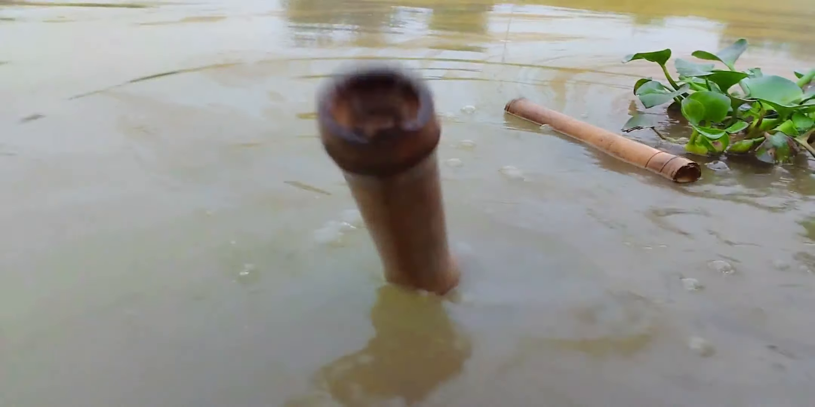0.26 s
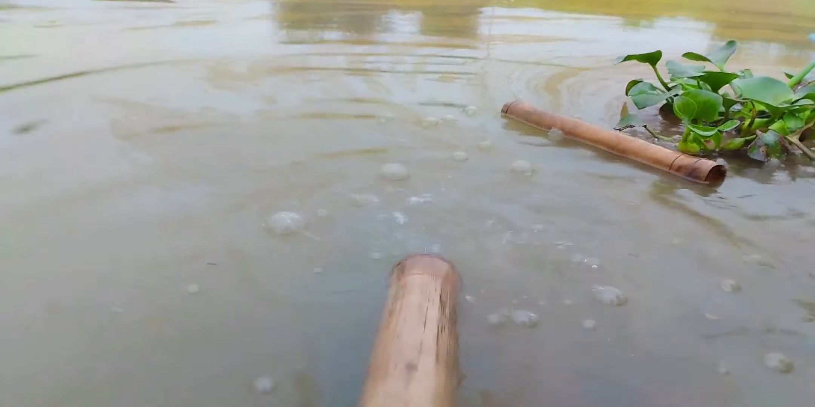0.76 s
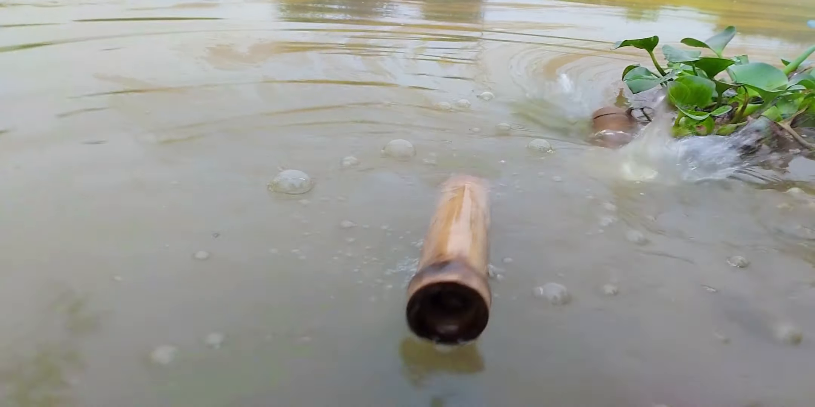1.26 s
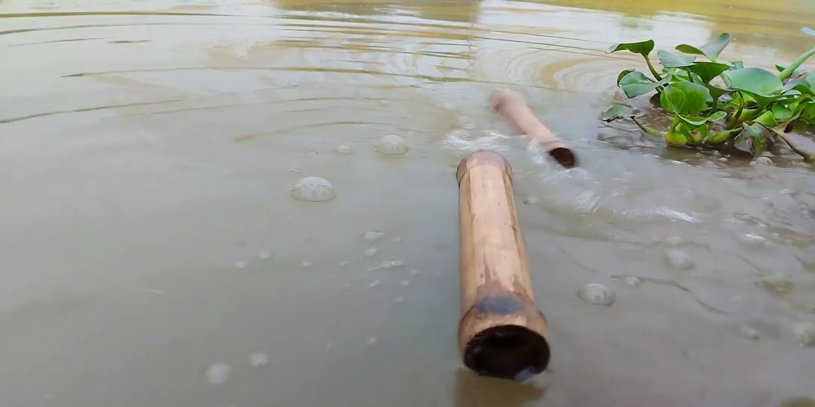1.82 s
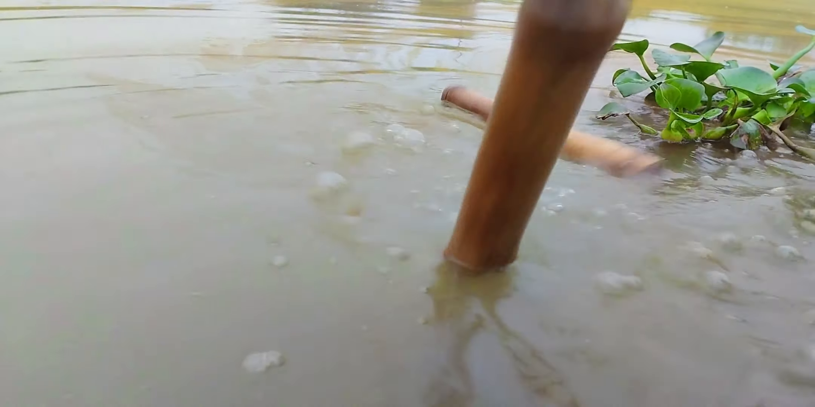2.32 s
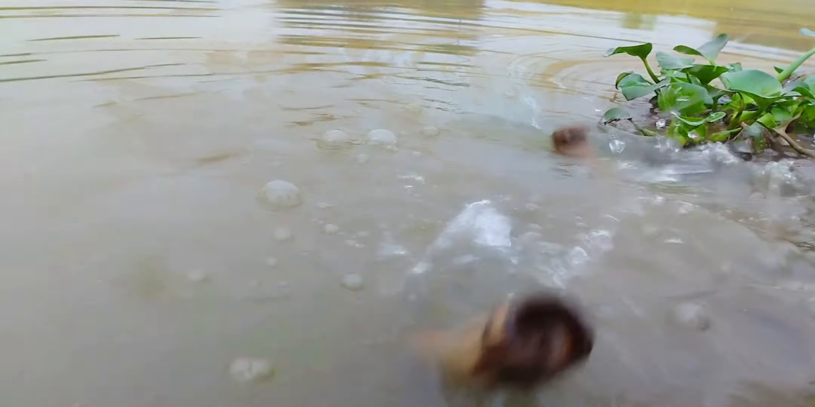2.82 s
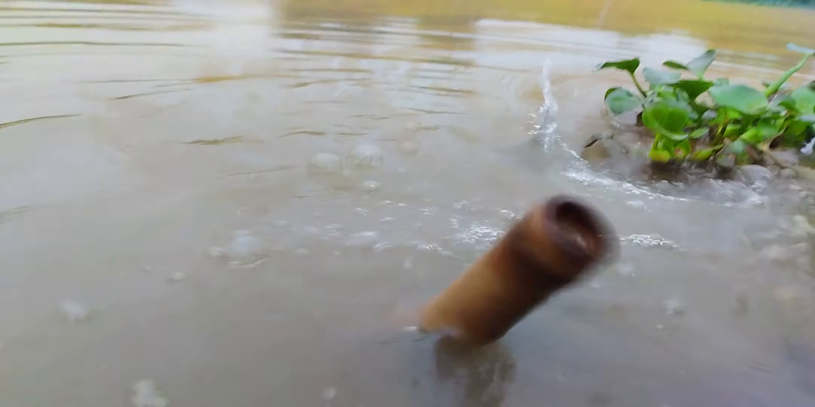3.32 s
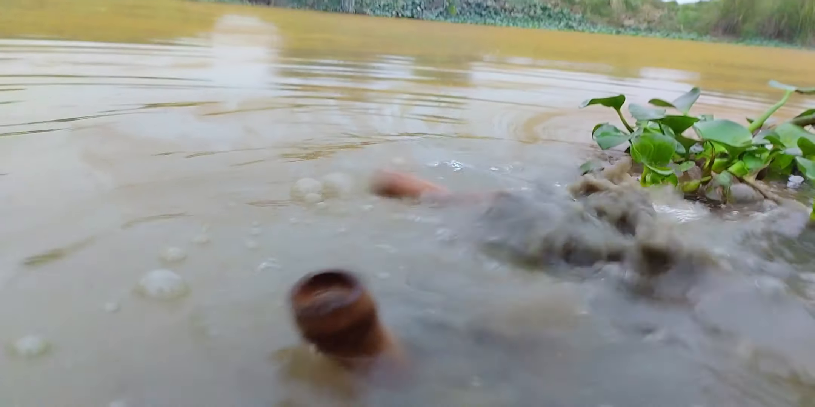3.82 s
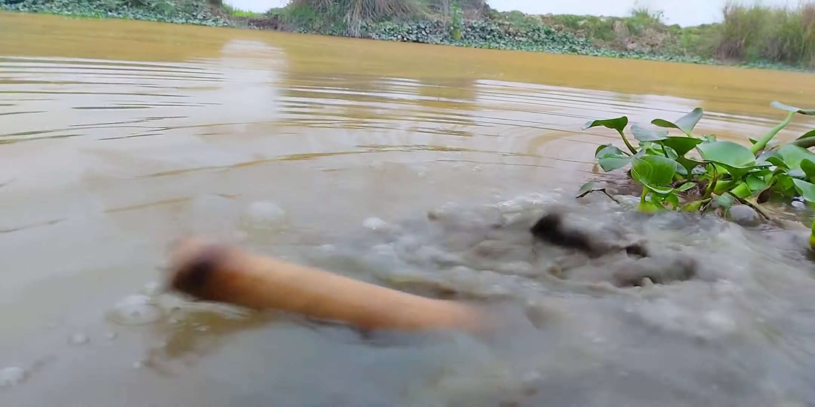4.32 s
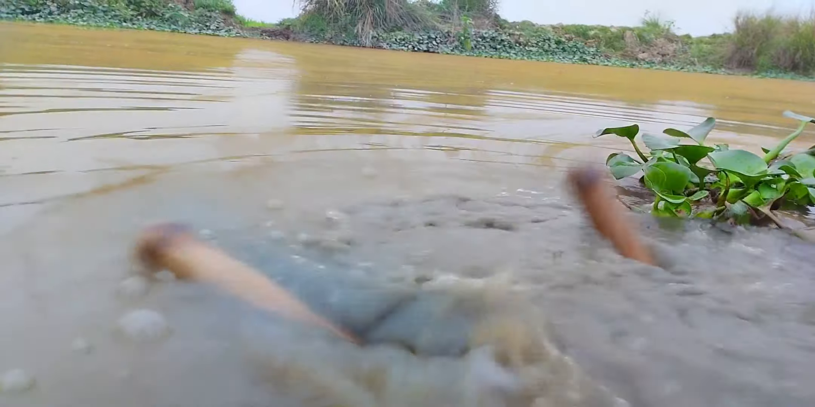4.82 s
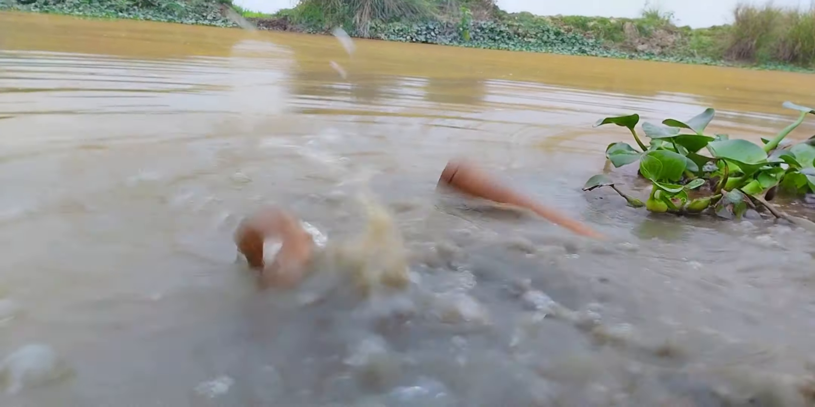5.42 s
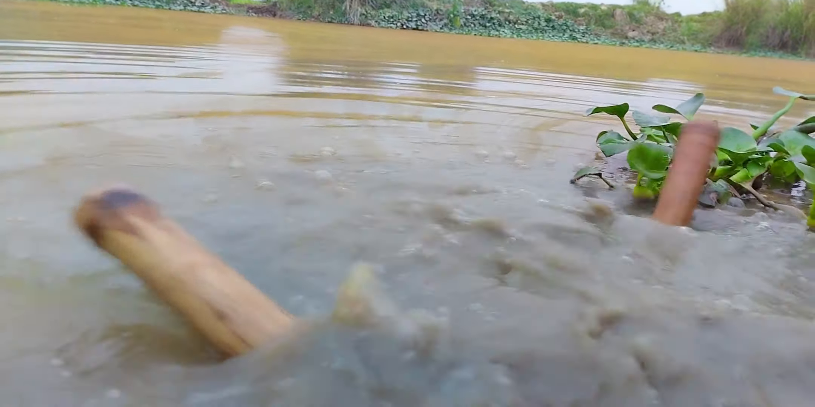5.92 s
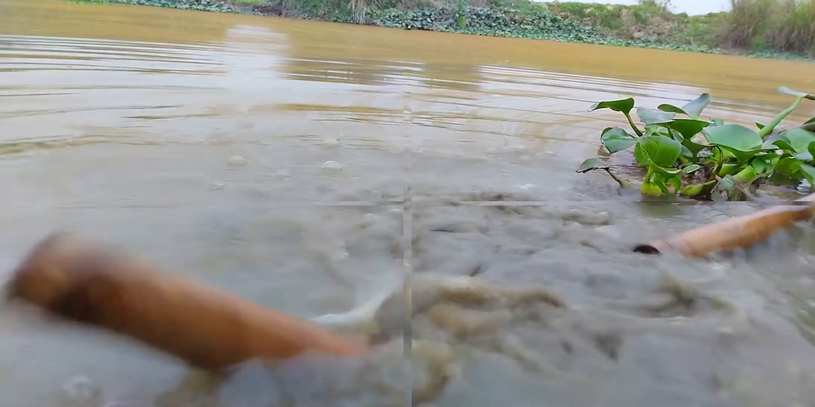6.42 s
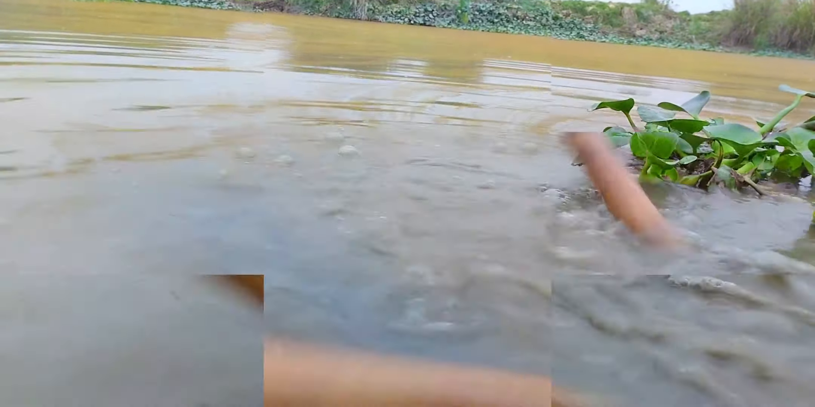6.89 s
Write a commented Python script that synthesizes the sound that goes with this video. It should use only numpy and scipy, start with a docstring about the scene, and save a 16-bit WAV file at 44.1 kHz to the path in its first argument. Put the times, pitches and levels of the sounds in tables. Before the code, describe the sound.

A hard splash and plop open the scene, then small clicks, slurps and drips, followed by scattered plunges of bamboo into shallow water. Around four seconds the stirred water bubbles thickly, and later splashes crowd together in clusters before thinning near the end. Close, dry outdoor perspective at a quiet riverbank, with low gusty wind buffeting the microphone and only the faintest echo.

```python
"""Bamboo tubes splashing in river shallows

Two bamboo tubes are jerked up and down in muddy shallows, close to the microphone. Their slaps are short
bursts of coloured noise; gushes of water are crowds of tiny ringing bubbles; dragged-under air rings as
plops, and closing hollows as rising notes. The stirred water gurgles and fizzes after each gush, the
tubes hum along, the bank scatters a faint echo, and a light, gusty wind rumbles on the microphone."""
import sys
import numpy as np
from scipy import signal
from scipy.fft import rfft, irfft
from scipy.io import wavfile

SR = 44100
rng = np.random.default_rng(int(sys.argv[2]) if len(sys.argv) > 2 else 0)


def transcribe(signal):
    """Save signal, clipped to [-1, 1], as a 16-bit WAV file at the path in sys.argv[1]."""
    frames = np.atleast_2d(signal).T
    limited = np.clip(frames, -1, 1)
    pcm = np.round(limited * 32767).astype(np.int16)
    wavfile.write(sys.argv[1], SR, pcm)


N = 315297
TIME = np.arange(N) / SR

# thrown water, before the trims in gushes(): start t/s, end t/s, body level/dB, spray level/dB
GUSHES = [(0.022, 0.053, -31, -27), (1.24, 1.3, -34, -41.5), (1.317, 1.427, -37.5, -41),
          (1.467, 1.574, -51, -49.5), (2.099, 2.129, -31, -26), (2.702, 2.729, -36.5, -28.5),
          (2.8, 2.884, -31, -28), (3.343, 3.363, -30.5, -34.5), (3.966, 4.015, -30.5, -46),
          (4.086, 4.14, -37.5, -35.5), (4.16, 4.34, -58, -62), (4.844, 4.93, -47.5, -41),
          (4.954, 5.011, -32, -37), (5.243, 5.31, -32, -33), (5.335, 5.395, -27.5, -41),
          (5.404, 5.536, -42.5, -49), (5.715, 5.768, -51, -41.5), (5.903, 5.928, -33.5, -36.5),
          (6.169, 6.213, -37.5, -37), (6.24, 6.283, -31.5, -35), (6.522, 6.583, -35.5, -37.5),
          (6.619, 6.684, -36.5, -37)]
# tone colour of the heavy body of water: f/Hz, relative level/dB
BODY_COLOUR = [(130, -13.5), (260, -1.5), (450, -3.5), (800, -2.5), (1500, 0.5), (2500, -12), (5000, -37.5)]
# tone colour of the fine spray: f/Hz, relative level/dB
SPRAY_COLOUR = [(300, -23.5), (1200, -5.5), (2200, -3), (3200, -3), (4200, -1.5), (6300, -3), (8800, 0.5),
                (10500, -5.5), (13000, -13.5), (16000, -20)]


def from_db(db):
    """Turn decibels into a gain."""
    return 10 ** (np.asarray(db) / 20)


def rms_one(x):
    """Scale a sound to an average power of 1."""
    return x / np.sqrt(np.mean(x ** 2) + 1e-20)


def at_hz(colour, hz):
    """Read a colour's level in dB at any pitch, with straight lines on a log-frequency axis."""
    points = np.array(colour)
    return np.interp(np.log(hz + 1e-9), np.log(points[:, 0]), points[:, 1])


def add(out, s, sound):
    """Mix a sound in, starting at time s in seconds."""
    i = int(np.clip(s * SR, 0, N - 1))
    out[i:i + len(sound)] += sound[:N - i]


def wander(size, count):
    """A random zigzag line through count points, which average 0 and spread by 1."""
    return np.interp(np.linspace(0, count - 1, size), np.arange(count), rng.standard_normal(count))


def noise(colour):
    """Steady noise of a given colour, with an average power of 1."""
    hz = np.fft.rfftfreq(N, 1 / SR)
    spectrum = rfft(rng.standard_normal(N)) * from_db(at_hz(colour, hz))
    return rms_one(irfft(spectrum, N))


def bubble(hz, t60, rise):
    """A pocket of air rings and climbs in pitch, dying faster as it nears the surface."""
    # t60: seconds to fall by 60 dB, before surfacing; rise: share of the starting pitch gained per second
    t = np.arange(int(1.2 * t60 * SR) + 2) / SR
    swell = 1 - np.exp(-t * hz / 0.99)   # takes about one cycle
    surfacing = np.exp(-(t / t60) ** 4)
    envelope = swell * from_db(-60 * t / t60) * surfacing
    return envelope * np.sin(2 * np.pi * hz * (t + rise * t * t / 2))


def ringing_poles(r, w):
    """Filter that rings at w radians per sample and shrinks by the factor r at every sample."""
    return [1, -2 * r * np.cos(w), r * r]


def grains(per_s, colour, cycles, spread_db, count=88):
    """Tiny bubbles of uneven strength, born at random, each strike one of many resonators."""
    born = np.flatnonzero(rng.random(N) < per_s / SR)
    loudness_db = spread_db * np.minimum(rng.exponential(1, len(born)), 3.5)
    strengths = from_db(loudness_db) * rng.choice([-1, 1], len(born))
    pitches = np.geomspace(200, 15500, count)   # Hz
    # the square root favours small, high bubbles
    share = np.sqrt(pitches) * from_db(at_hz(colour, pitches))
    dealt = np.searchsorted(np.cumsum(share / share.sum()), rng.random(len(born)))
    out = np.zeros(N)
    for k, hz in enumerate(pitches):
        clicks = np.full(N, 1e-18)   # not quite zero, which keeps the filter fast
        clicks[born[dealt == k]] = strengths[dealt == k]
        r = from_db(-60 * hz / (cycles * SR))   # falls by 60 dB in this many cycles
        poles = ringing_poles(r, 2 * np.pi * hz / SR)
        out += np.sqrt(share[k] * hz) * signal.lfilter([1, 0, -1], poles, clicks)
    return rms_one(out)


def gurgle(low_hz=420, high_hz=3200, cycles=28, climb=0.27, spread_db=0.5, tilt_db=1.0, count=1500):
    """Small bubbles surface at random times in the stirred water, each a short note bending upward."""
    # cycles and climb are averages over the bubbles; tilt_db is per octave
    out = np.zeros(N)
    for when, size, strength, life, depth in rng.random((count, 5)):
        hz = low_hz * (high_hz / low_hz) ** size
        t60 = cycles * (.5 + life) / hz
        db = -spread_db * np.log(strength + 0.051) + tilt_db * np.log2(hz / low_hz)
        add(out, when * N / SR, from_db(db) * bubble(hz, t60, 2 * climb * depth / t60))
    return rms_one(out)


def stirring(fall_db_per_s):
    """Strength of body and spray that builds up during each gush and dies away after it."""
    power = np.zeros((2, N))
    for start, end, body_db, spray_db in GUSHES:
        build_up = np.clip((TIME - start) / (end - start), 0, 1)
        settling = from_db(-fall_db_per_s * np.maximum(TIME - end, 0))
        power += np.square(from_db([[body_db], [spray_db]]) * build_up * settling)
    return np.sqrt(power)


def wind(deep_db=-5.0, level_db=0.5, lumps_db=3.5, heave_fall_db_per_s=200):
    """Lumpy low rumble of air on the microphone: a breeze, a few gusts and a push from each gush."""
    # gusts, before the trims below: peak t/s, time from peak to 1/e of it t/s, level/dB
    gust_rows = [(0.432, 0.15, -28.5), (1.685, 0.02, -31), (4.31, 0.12, -26.5), (4.68, 0.11, -32.5),
                 (5.378, 0.022, -27.5), (6.65, 0.089, -22)]
    # deepest buffeting: f/Hz, relative level/dB
    buffet_colour = [(15, 5), (35, 7), (60, -1.5), (100, 1), (250, -55), (1000, -86)]
    # rumble above it: f/Hz, relative level/dB
    wind_colour = [(30, -2), (70, -3), (125, -5), (190, -8), (300, -15.5), (500, -31.5), (1000, -33),
                   (3000, -88)]
    breeze_db, rumble_db = -51, -46   # steady buffeting and rumble, before the trims
    gust_rumble_db = -15   # rumble relative to a gust
    heave_db = -10.5   # low push of the displaced water, relative to the body of its gush
    gust = np.zeros(N)
    for peak, half_s, db in gust_rows:
        gust += from_db(db) * np.exp(-np.square((TIME - peak) / half_s))
    heave = from_db(heave_db) * stirring(heave_fall_db_per_s)[0]
    buffet = np.hypot(from_db(breeze_db), gust)
    rumble = np.hypot(from_db(rumble_db), from_db(gust_rumble_db) * gust + heave)
    air = from_db(deep_db) * buffet * noise(buffet_colour)
    air += from_db(level_db) * rumble * noise(wind_colour)
    return from_db(lumps_db * wander(N, count=300)) * air


def open_air(level_db=-62.5):
    """Faint, steady coloured noise of the open air."""
    # f/Hz, relative level/dB
    air_colour = [(100, 16.5), (400, -31), (1500, -14), (4000, -33), (8500, 4), (13000, -8), (16000, 3)]
    return from_db(level_db) * noise(air_colour)


def churn(bubbles_db=-7.5, wash_db=-12.0, crackle_db=-9.0, hiss_db=-9.5, patter_db=5.0):
    """Stirred water gurgles while its foam bursts in small flurries, more strongly in the wake of a gush."""
    # restlessness of the shallows, before the lifts below: t/s, gurgle level/dB, fizz level/dB
    churn_rows = [(0.0, -61.5, -63), (0.52, -54.5, -57), (0.75, -50.5, -54.5), (0.9, -64, -55.5),
                  (1.27, -66, -62), (1.39, -51, -61.5), (1.75, -59, -54.5), (2.67, -60.5, -57.5),
                  (2.95, -41.5, -44), (3.62, -56.5, -52.5), (3.92, -51.5, -50), (4.18, -31.5, -40),
                  (4.64, -56.5, -49.5), (5.22, -47, -50.5), (5.42, -49, -35.5), (5.55, -51.5, -48.5),
                  (6.61, -47.5, -46.5), (7.15, -57, -59)]
    gurgle_lift_db, fizz_lift_db = 4.5, 8
    wake_gurgle_db, wake_fizz_db = -15, -15.5   # relative to the body and spray of the gush
    s, gurgle_points, fizz_points = np.transpose(churn_rows)
    gurgle_db = np.interp(TIME, s, gurgle_points) + gurgle_lift_db
    fizz_db = np.interp(TIME, s, fizz_points) + fizz_lift_db
    body, spray = stirring(fall_db_per_s=107)
    gurgling = np.hypot(from_db(gurgle_db), from_db(wake_gurgle_db) * body)
    fizzing = np.hypot(from_db(fizz_db), from_db(wake_fizz_db) * spray)
    low = from_db(bubbles_db) * gurgle() + from_db(wash_db) * noise(BODY_COLOUR)
    high = from_db(crackle_db) * grains(1200, SPRAY_COLOUR, cycles=59, spread_db=5.0)
    high += from_db(hiss_db) * noise(SPRAY_COLOUR)
    flurries = rms_one(from_db(patter_db * wander(N, count=700)))
    return flurries * (gurgling * low + fizzing * high)


def gushes(attack_s=0.0026, fall_t60=0.092, sag_db=1.5, clump_db=3.0,
           coarse_db=-4.5, notes_db=-1.0, spray_trim_db=3.5):
    """A sheet of water tears, peaks and falls back in clumps: crowded bubble notes under a fine spray."""
    body, spray = np.zeros(N), np.zeros(N)
    t = np.arange(SR // 2) / SR
    for start, end, body_db, spray_db in GUSHES:
        length = end - start
        arch_db = -sag_db * (2 * np.minimum(t / length, 1) - 1) ** 2   # highest halfway
        fall_db = -60 * np.maximum(t - length, 0) / fall_t60
        envelope = (1 - np.exp(-t / attack_s)) * from_db(arch_db + fall_db)
        add(body, start, from_db(body_db) * envelope)
        add(spray, start, from_db(spray_db + spray_trim_db) * envelope)
    clumps = rms_one(from_db(clump_db * wander(N, count=900)))
    coarse = from_db(coarse_db) * grains(420, BODY_COLOUR, cycles=20, spread_db=2.5)
    notes = from_db(notes_db) * gurgle(low_hz=420, high_hz=2777, cycles=76, climb=0.191,
                                       spread_db=3.5, tilt_db=6.5, count=3600)
    fine = grains(2600, SPRAY_COLOUR, cycles=83, spread_db=3.0)
    return clumps * (body * (coarse + notes) + spray * fine)


def slaps(level_db=-4.0, attack_s=0.001165, ripple_db=5.5, tail_db=-24, tail_t60=0.016,
          lead_in_db=-20, lead_in_s=0.00047, size=4096):
    """Each impact swells from a very short, faint onset of noise into a coloured burst, and sizzles out."""
    # bamboo on water: t/s, level/dB before level_db, centre f/Hz, time to fall 60 dB t/s (at least 3 ms used)
    slap_rows = [(0.034, -16, 5000, 0.0045), (0.256, -37.5, 3000, 0.023), (0.558, -17, 8450, 0.1),
                 (0.571, -9, 9300, 0.027), (0.693, -30, 4250, 0.028), (0.823, -9, 7240, 0.01),
                 (0.881, -20.5, 8300, 0.024), (1.243, -16.5, 5870, 0.015), (1.333, -15, 5050, 0.015),
                 (1.425, -28.5, 6800, 0.053), (1.515, -21.5, 8200, 0.013), (1.555, -31.5, 2770, 0.032),
                 (1.733, -25.5, 6950, 0.034), (2.107, -11.5, 6400, 0.032), (2.292, -20.5, 4300, 0.0047),
                 (2.425, -25, 6050, 0.0057), (2.722, -0.5, 6670, 0.027), (2.814, -13.5, 5270, 0.12),
                 (2.893, -13, 5970, 0.025), (3.03, -21.5, 8300, 0.017), (3.094, -32, 3060, 0.013),
                 (3.205, -5, 6500, 0.022), (3.387, -23, 4770, 0.021), (3.422, -32.5, 3440, 0.12),
                 (3.868, -23.5, 7060, 0.031), (4.001, -22.5, 6500, 0.051), (4.128, -15, 7400, 0.011),
                 (4.202, -11, 7750, 0.018), (4.242, -21, 5870, 0.07), (4.403, -30, 5450, 0.12),
                 (4.436, -19.5, 5200, 0.033), (4.498, -18, 8800, 0.019), (4.671, -28.5, 5570, 0.01),
                 (4.74, -28, 4350, .025), (4.862, -2.5, 9400, 0.0024), (4.967, -19.5, 3200, 0.028),
                 (5.005, -8, 5730, 0.017), (5.301, -14.5, 6450, 0.0095), (5.373, -13.5, 4500, .063),
                 (5.427, -22, 4290, 0.019), (5.45, -20.5, 6500, 0.037), (5.469, -17.5, 7600, .028),
                 (5.623, -22.5, 7110, 0.0027), (5.741, -20.5, 8060, 0.017), (5.855, -22, 6500, 0.057),
                 (6.175, -13.5, 6650, 0.012), (6.259, -16.5, 7500, 0.025), (6.418, -27, 6730, 0.048),
                 (6.495, -25.5, 7260, 0.02), (6.563, -16, 8900, 0.0056), (6.623, -19, 5400, 0.038),
                 (7.024, -13, 7900, 0.024), (7.124, -12.5, 7270, 0.023)]
    # a slap that rings longer stirs up more sizes of bubbles, so its band is wider
    typical_width_octaves, typical_t60, widening_power = 0.77, .02, 0.58
    out, hz = np.zeros(N), np.fft.rfftfreq(size, 1 / SR) + 1
    t = np.arange(size) / SR - .015   # leaves room ahead of the burst for a soft, very short lead-in
    after = np.maximum(t, 0)
    for s, db, centre, listed_t60 in slap_rows:
        t60 = max(listed_t60, .003)
        width = typical_width_octaves * (t60 / typical_t60) ** widening_power
        band = 1 / (1 + (np.log2(hz / centre) / width) ** 2)
        ripple = ripple_db * wander(len(hz), count=48)
        colour = band * from_db(at_hz(SPRAY_COLOUR, hz) + ripple)
        random_phases = np.exp(2j * np.pi * rng.random(len(hz)))
        cloud = rms_one(irfft(colour * random_phases))
        decay = from_db(-60 * after / t60) + from_db(tail_db - 60 * after / tail_t60)
        burst = (1 - np.exp(-after / attack_s)) ** 2 * decay
        lead_in = from_db(lead_in_db) * np.exp(-np.square(t / lead_in_s))
        envelope = burst / burst.max() + lead_in
        # give the noise exactly the power of its envelope
        slap = rms_one(cloud * envelope) * np.sqrt(np.mean(envelope ** 2))
        add(out, s + t[0] - attack_s, from_db(db + level_db) * slap)
    return out


def plops(level_db=5.0, spit_db=-32, spit_follows=0.28, spit_t60=0.028):
    """Air pockets pinch off with a spit of spray and ring; the larger ones climb in pitch as they surface."""
    # ringing pockets: t/s, starting f/Hz, level/dB before level_db, time to fall 60 dB without surfacing t/s
    plop_rows = [(0.046, 1390, -7, 0.012), (.053, 560, 9, 0.0027), (0.058, 224, -16.5, 0.074),
                 (.253, 743, -37, 0.094), (.34, 2370, -33, 0.027), (0.638, 1183, -34.5, 0.081),
                 (0.67, 600, 1.5, 0.0048), (0.671, 2120, -16.5, 0.0074), (.69, 2030, -30, 0.027),
                 (0.809, 2064, -25.5, 0.057), (0.824, 2770, -18.5, 0.018), (.822, 3620, -21, 0.014),
                 (.887, 3330, -26.5, 0.012), (1.243, 495, -17, 0.017), (1.287, 326, -29.5, 0.2),
                 (1.327, 330, -6.5, .011), (1.333, 574, -17, 0.022), (1.336, 276, -11.5, 0.041),
                 (2.115, 850, -8, 0.0066), (2.117, 477, -5.5, 0.012), (2.187, 675, -35, 0.034),
                 (2.189, 463, -35, 0.26), (2.251, 692, -26.5, 0.077), (2.326, 2210, -25, 0.021),
                 (2.817, 693, -9.5, 0.047), (2.831, 595, 2.5, 0.0085), (2.842, 590, -16, 0.0089),
                 (2.861, 560, 8.5, 0.0026), (2.87, 696, 12, 0.0025), (2.878, 735, -6, 0.048),
                 (2.956, 1810, -28.5, 0.03), (3.029, 713, -34.5, 0.13), (3.035, 310, -24, 0.056),
                 (3.08, 374, -28.5, 0.11), (3.095, 2640, -29, 0.032), (3.205, 2720, -22, 0.024),
                 (3.344, 674, -7.5, 0.0067), (3.348, 213, -25, 0.16), (3.425, 2130, -22, 0.015),
                 (3.424, 3190, -25, 0.021), (3.657, 380, -9.5, 0.04), (3.66, 443, -10.5, 0.081),
                 (3.87, 1810, -20.5, 0.0075), (3.985, 384, -22.5, 0.064), (3.992, 610, -23, 0.057),
                 (4.114, 1500, -24, 0.031), (4.13, 623, -20.5, 0.063), (4.196, 419, -26, 0.1),
                 (4.197, 1840, -3, 0.0039), (4.438, 277, -13.5, 0.037), (4.499, 1295, -29.5, 0.045),
                 (4.741, 3670, -17, 0.015), (4.862, 490, -24, 0.047), (4.914, 876, -24.5, 0.079),
                 (4.979, 1493, -19, 0.083), (5.001, 676, -13, 0.022), (5.002, 359, -15, 0.17),
                 (5.19, 800, -27.5, 0.012), (5.301, 645, -9, 0.0069), (5.302, 455, -22.5, 0.086),
                 (5.369, 247.6, -15.5, 0.075), (5.346, 1270, -25, .06), (5.373, 730, 2.5, 0.015),
                 (5.373, 1100, -2.5, 0.0051), (5.897, 643, -18, 0.05), (5.919, 940, -25.5, 0.11),
                 (5.922, 1360, -24, 0.035), (6.189, 1520, -20.5, .015), (6.25, 712, -25.5, .12),
                 (6.534, 753, -33, 0.14), (6.642, 666, -13.5, 0.013), (6.646, 365, -2, 0.008),
                 (6.652, 360, -0.5, 0.01), (6.84, 482, -47, 0.19)]
    # spray of a pocket that pinches off: f/Hz, relative level/dB
    spit_colour = [(400, -4), (1500, 0), (2600, -4.5), (5000, -21), (10000, -11), (16000, -26)]
    # large pockets climb by this share of their pitch in one t60; those far above steady_hz hardly climb
    full_climb, steady_hz = 0.54, 1100
    out, spit = np.zeros(N), np.zeros(N)
    t = TIME[:SR // 10]
    for s, hz, db, t60 in plop_rows:
        climb = full_climb / (1 + (hz / steady_hz) ** 4)
        add(out, s, from_db(db + level_db) * bubble(hz, t60, climb / t60))
        # the spit grows less than the plop does
        add(spit, s, from_db(spit_db + spit_follows * db - 60 * t / spit_t60))
    return out + spit * noise(spit_colour)


def closing_note(length, first_hz, waver=0.081, flutter_db=3.5):
    """A closing hollow swells and fades while its note climbs ever faster, shaken by the moving water."""
    # wide hollows, with notes below wide_hz, close more slowly
    octaves_per_s, wide_hz = 24.7, 230
    octaves = octaves_per_s * length / (1 + np.square(wide_hz / first_hz))
    last_hz = first_hz * 2 ** octaves
    closing = np.linspace(0, 1, int(length * SR))
    smooth_hz = 1 / ((1 - closing) / first_hz + closing / last_hz)
    hz = smooth_hz * (1 + waver * wander(len(closing), count=24))
    envelope = np.sin(np.pi * closing) * from_db(flutter_db * wander(len(closing), count=12))
    return envelope * np.sin(2 * np.pi * np.cumsum(hz) / SR)


def slurps(level_db=3.0, small_db=-47, small_follows=0.63, delay_s=0.062,
           lowest_octaves=0.307, highest_octaves=1.2, count=2):
    """Each hollow closes with a rising note and sheds smaller ones: later, higher and mostly fainter."""
    # hollows in the surface: start t/s, length t/s, first f/Hz, level/dB before level_db
    slurp_rows = [(.274, 0.05, 823, -54), (0.672, 0.026, 271, -32.5), (.712, 0.03, 356, -42),
                  (.75, 0.082, 374, -55), (0.793, .05, 475, -44.5), (.835, 0.042, 893, -49),
                  (1.358, 0.058, 432, -28), (1.783, 0.027, 645, -52), (2.211, 0.029, 684, -31),
                  (2.819, 0.056, 199.4, -26.5), (2.885, 0.035, 870, -51), (2.95, 0.2, 125, -41),
                  (3.089, 0.05, 292, -38.5), (3.099, 0.023, 550, -71), (3.198, 0.046, 450, -40),
                  (3.356, 0.021, 1040, -32.5), (3.696, 0.043, 550, -34), (3.968, 0.032, 210, -30.5),
                  (4.229, 0.052, 420, -37.5), (4.78, 0.029, 770, -51), (4.859, .05, 495, -34.5),
                  (6.112, 0.029, 1002, -40), (6.66, 0.057, 132.5, -28), (6.706, 0.046, 493, -32.5),
                  (6.785, 0.029, 363, -35.5), (6.87, 0.053, 384, -52)]
    out = np.zeros(N)
    typical_db = np.mean([row[3] for row in slurp_rows])
    for s, length, first_hz, db in slurp_rows:
        add(out, s, from_db(db + level_db) * closing_note(length, first_hz))
        shed_gain = from_db(small_db + small_follows * (db - typical_db))
        for late, size in rng.random((count, 2)):
            octaves = lowest_octaves + size * (highest_octaves - lowest_octaves)
            shed_note = closing_note(0.693 * length, first_hz * 2 ** octaves)
            add(out, s + late * delay_s, shed_gain * shed_note)
    return out


def tube(x):
    """The air column in the hollow bamboo hums briefly with the splashing, through ringing filters."""
    # resonances of the air column: f/Hz, width f/Hz, gain level/dB
    tube_rows = [(401, 210, -4.5), (838, 44, 2), (1167, 60, -7), (1510, 300, -7)]
    out = np.zeros(N)
    for hz, width_hz, db in tube_rows:
        r, w = np.exp(-np.pi * width_hz / SR), 2 * np.pi * hz / SR
        gain = from_db(db) * (1 - r * r) * np.sin(w)
        out += gain * signal.lfilter([0, 1], ringing_poles(r, w), x)
    return out


def bank(x, echo_db=-22, t60=0.11, size=12000):
    """Faint scatter from the bank and the plants: an echo of fading noise that starts after 4 ms."""
    t = np.arange(size) / SR
    response = rng.standard_normal(size) * from_db(-60 * t / t60) * (t > .004)
    return from_db(echo_db) * signal.fftconvolve(x, response / np.linalg.norm(response))[:N]


def scene():
    """Water close by, with wind and open air around it."""
    wash = slaps() + gushes() + churn()
    water = plops() + slurps() + wash + tube(wash)
    return (water + bank(water) + wind() + open_air())[None]


def record(dry):
    """The loudest peaks clip, then a steep filter cuts the top above 16.1 kHz."""
    clipped = np.clip(dry, -1, 1)
    top_cut = signal.ellip(10, .2, 80, 16100, fs=SR, output="sos")
    return signal.sosfilt(top_cut, clipped)


dry = scene()
out = record(dry)
transcribe(out)
```